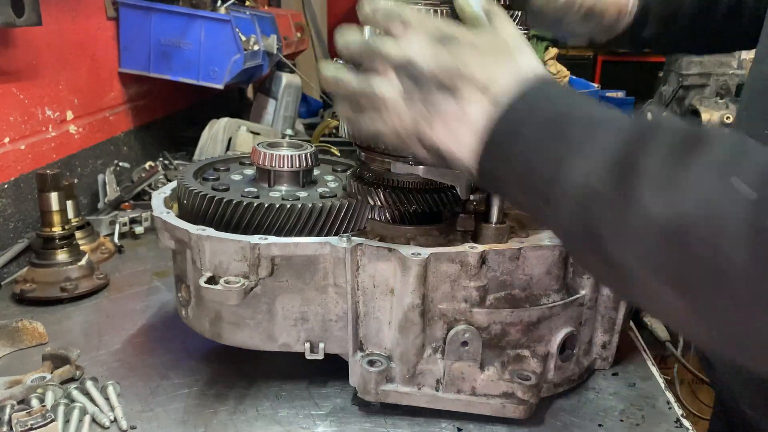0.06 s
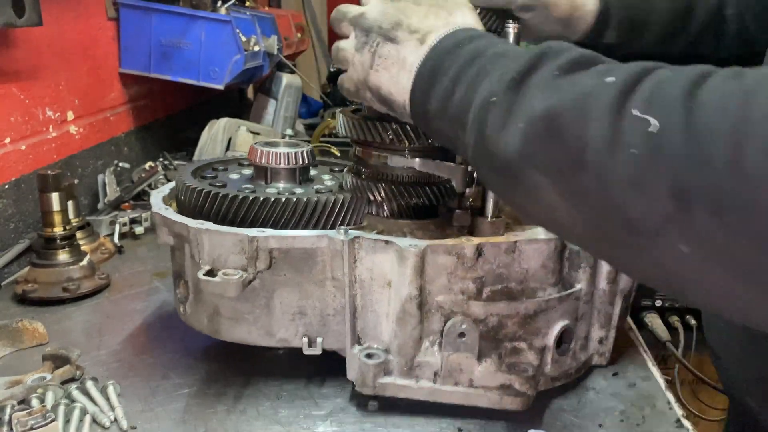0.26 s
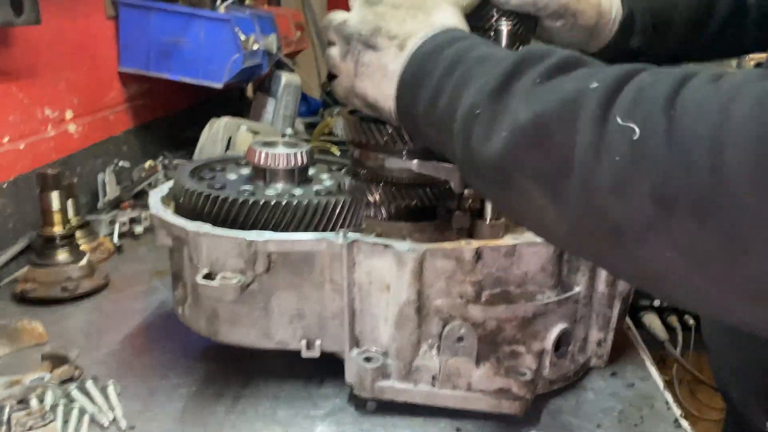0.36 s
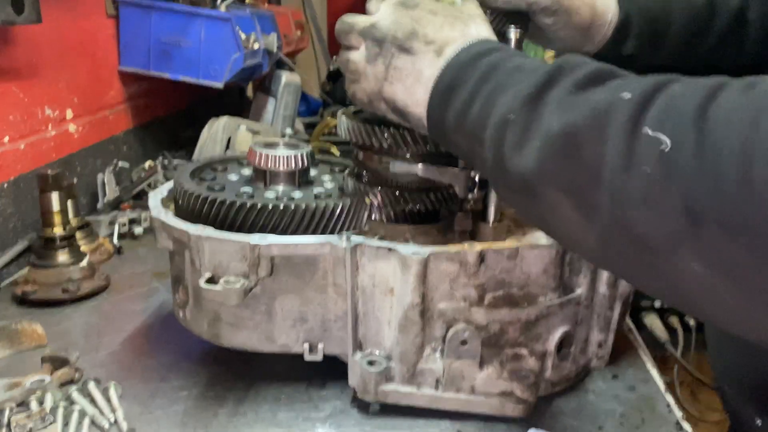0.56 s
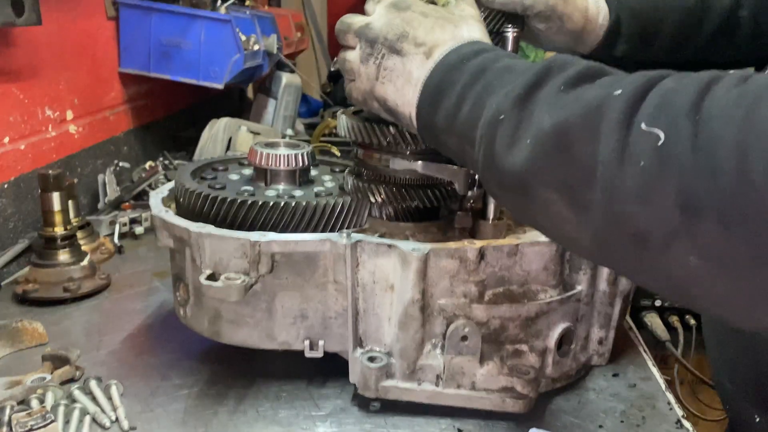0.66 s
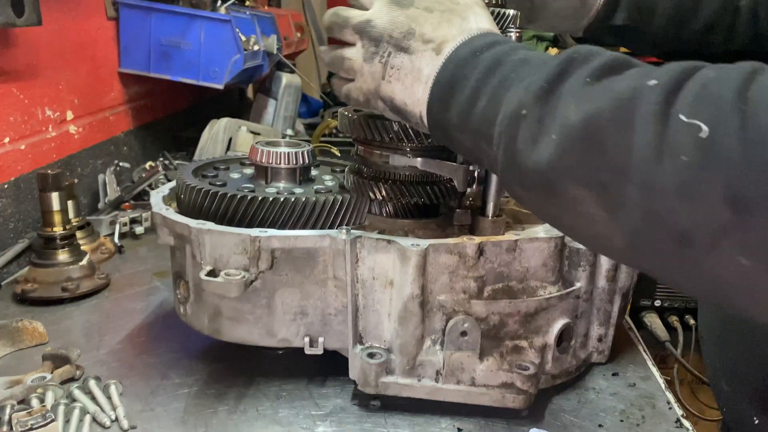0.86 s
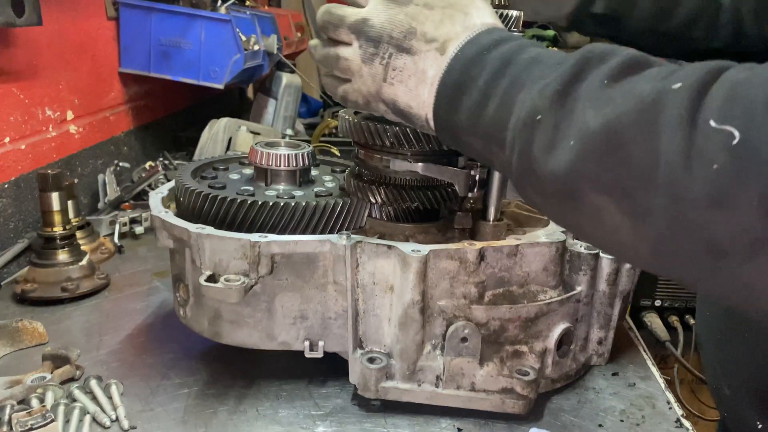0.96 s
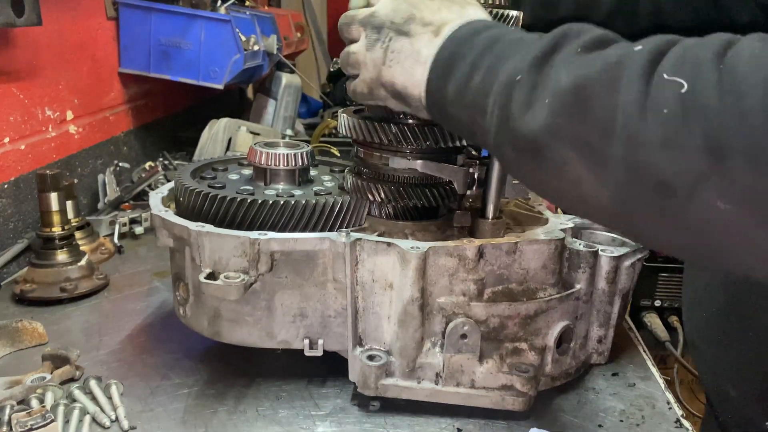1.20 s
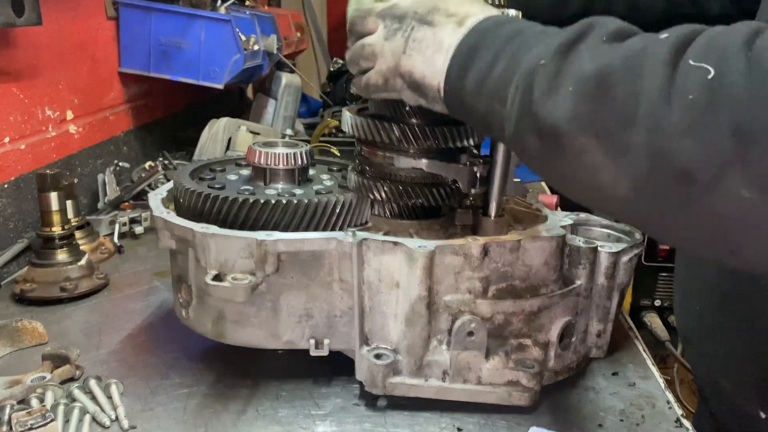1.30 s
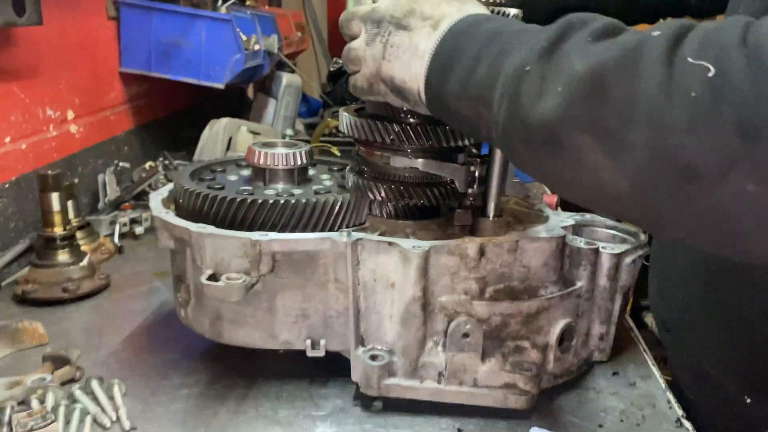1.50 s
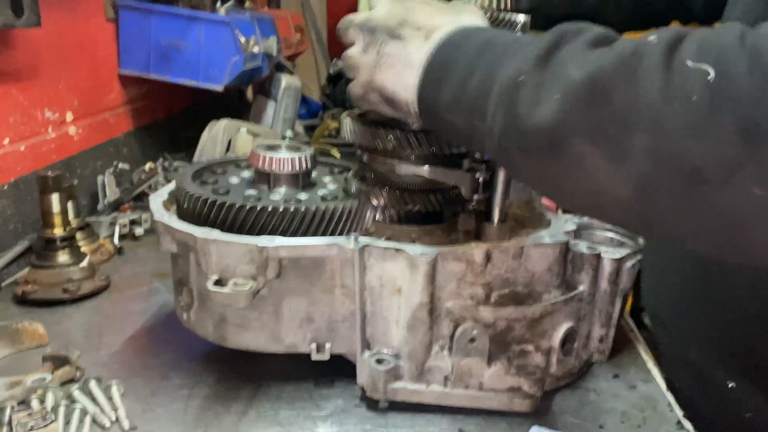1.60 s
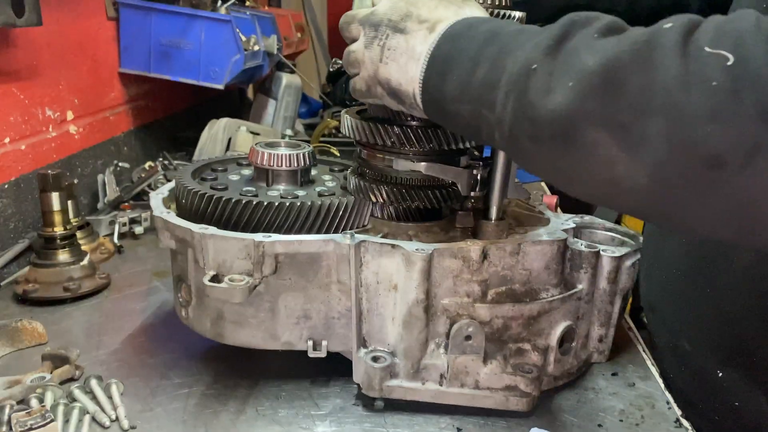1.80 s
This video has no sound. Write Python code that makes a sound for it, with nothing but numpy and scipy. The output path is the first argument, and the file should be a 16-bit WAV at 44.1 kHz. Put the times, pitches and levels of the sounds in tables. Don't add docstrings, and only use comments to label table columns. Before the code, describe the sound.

Steel gear clusters clatter and knock in an alloy gearbox case on a workshop bench

```python
import sys
import numpy as np
from scipy import signal
from scipy.fft import rfft, irfft
from scipy.io import wavfile
from scipy.ndimage import uniform_filter1d

SR = 44100
rng = np.random.default_rng(int(sys.argv[2]) if len(sys.argv) > 2 else 0)


def materialize(psi):
    bounded = np.clip(np.atleast_2d(psi).T, -1, 1)
    quanta = np.round(bounded * 32767).astype(np.int16)
    wavfile.write(sys.argv[1], SR, quanta)


def field_ratio(decibels):
    return 10 ** (np.asarray(decibels, dtype=float) / 20)


N = 81585
SIDES = np.array([[1], [-1]])


def on_log(hz, table):
    table = np.array(table, float)
    return np.interp(np.log(np.maximum(hz, 1)), np.log(table[:, 0]), table[:, 1])


def rings(hz, t60, length_s):
    t = np.arange(int(length_s * SR)) / SR
    fade = np.log(1000) / np.maximum(t60, .004)
    return np.exp(np.outer(2j * np.pi * hz - fade, t))


def add(out, start_s, x, peak_db):
    i = int(start_s * SR)
    x = x[:, :N - i]
    out[:, i:i + x.shape[1]] += x * field_ratio(peak_db) / np.abs(x.mean(axis=0)).max()


def blows(rows, partials, rise_s, apart_s):
    out, partials = np.zeros((2, N)), np.array(partials)
    ratio, ratio_db = partials.T
    luck = rng.standard_normal((len(rows), len(partials)))
    for (start_s, peak_db, hz, t60), g in zip(rows, luck):
        level = field_ratio(ratio_db + 2 * g * (ratio != 1))
        x = level @ rings(hz * ratio, t60 / ratio, .3)
        x = x * (1 - np.exp(-np.arange(len(x)) / SR / rise_s))
        turn = np.exp(1j * np.pi * hz * apart_s * SIDES)
        add(out, start_s, (x * turn).imag, peak_db)
    return out


def bands(length):
    f = np.fft.rfftfreq(length, 1 / SR)
    for hz in 25 * 2 ** np.arange(0, 9.4, 1 / 3):
        shape = np.exp(-(np.log2(f / hz + 1e-9) * 4) ** 2)
        mid, side = irfft(rfft(rng.standard_normal((2, length))) * shape, length)
        share = hz ** 2 / (hz ** 2 + 240 ** 2)
        yield hz, mid + share * side * SIDES


def wander(k, smooth):
    steps = np.repeat(rng.standard_normal(N // k + 1), k)
    return uniform_filter1d(steps, smooth)[:N]


# start in seconds, peak in dB, chatter length in seconds, tilt in dB per octave.
ROCKING = [(.022,-32,0.016,3.5),(.044,-16.5,0.0044,6),(.093,-24,0.021,-7),(.109,-14.5,0.018,4.5),(.175,-16.5,0.011,1),(.198,-14,0.03,-5),(.226,-17,0.018,-2.5),(.240,-23.5,0.0099,20.5),(.246,-6.5,0.023,-0.5),(.262,-11.5,0.021,-6),(.303,-2,0.015,2.5),(.325,-15,0.018,-1),(.345,-6.5,0.014,-2.5),(.355,-7.5,0.018,-4.5),(.365,1.5,0.014,1.5),(.376,-0.5,.02,7.5),(.394,2,.016,3.5),(.408,-14,0.02,4),(.476,-44,0.0085,20),(.500,-27,0.018,-18),(.519,-13.5,0.014,-6.5),(.547,-18.5,0.012,2),(.626,-7.5,0.01,2),(.644,-10.5,0.018,-0.5),(.672,-6,0.013,-2),(.944,-31.5,0.023,-9),]
# start in seconds, peak in dB, chatter length in seconds, tilt in dB per octave.
SETTLING = [(1.053,-58,.008,-5),(1.133,-45,0.025,18),(1.15,-26,.025,-6),(1.176,-14.5,0.017,-2.5),(1.196,-12,.02,-4),(1.224,-21,0.012,-12),(1.261,-18.5,.02,-7),(1.281,-8,.016,-2.5),(1.294,-4,0.028,-1.5),(1.316,-6,0.02,-12.5),(1.328,-16,.025,11),(1.365,-27,.01,14),(1.385,-17.5,.03,-4.5),(1.422,-13,.012,-0.5),(1.431,2,.016,-4.5),(1.447,-4,.02,-1.5),(1.459,-8.5,.022,-1.5),(1.497,-20.5,.016,-5.5),(1.526,-7.5,0.03,-6.5),(1.563,-2.5,.014,-1),(1.576,-12,.028,-8.5),(1.677,-22,0.03,-9),(1.703,-19.5,0.028,-9),(1.734,-55,0.021,-32),(1.816,-27,.01,-6),]
# pitch in Hz, level in dB, t60 in seconds.
GEARS = [(1510,-13.5,0.25),(2460,1,0.067)]
# frequency in Hz, level in dB per Hz.
CLATTER = [(350,-11.5),(1240,-2.5),(2070,-1.5),(3100,-8),(4200,-20.5),(7000,-41),(11000,-49.5),(16000,-64)]


def steel_contacts(hits):
    count, ticks = 160, 70
    clatter_t60_s, t60_slope = .045, -.1
    clatter_scatter_db, gear_scatter_db = 3, 4
    chatter_fall_db, chatter_scatter_db, first_db = -11, 2.6, 3
    first_touch, chatter_rise = .4, .25
    width_rad, width_hz = 1.4, 180
    out, gears = np.zeros((2, N)), np.array(GEARS)
    hz = np.geomspace(350, 16000, count) * (1 + .01 * rng.standard_normal(count))
    t60 = clatter_t60_s * (hz / 1000) ** t60_slope
    dense_db = on_log(hz, CLATTER) + 10 * np.log10(hz / 1000) - 10 * np.log10(t60 / clatter_t60_s)
    every = np.r_[hz, gears[:, 0]]
    bank = rings(every, np.r_[t60, gears[:, 2]], .15)
    luck = rng.standard_normal((len(hits), 3, len(every)))
    when = rng.random((len(hits), 2, ticks))
    for (start_s, peak_db, length_s, tilt_db), g, w in zip(hits, luck, when):
        clatter_db = dense_db + clatter_scatter_db * g[0, :count]
        gear_db = gears[:, 1] + gear_scatter_db * g[0, count:]
        level = field_ratio(np.r_[clatter_db, gear_db] + tilt_db * np.log2(every / 1500))
        apart = width_rad * g[1] * every / (every + width_hz)
        body = np.array([((level * np.exp(1j * (g[2] + k * apart / 2))) @ bank).imag for k in (1, -1)])
        place = np.r_[0, w[0, 1:] ** 1.3]
        size_db = chatter_fall_db * place - chatter_scatter_db * np.log(w[1]) + first_db * (place == 0)
        size = field_ratio(size_db) * np.minimum(first_touch + place / chatter_rise, 1)
        push = np.zeros(int(max(1.4 * length_s, .001) * SR) + 2)
        spot = (place * (len(push) - 1)).astype(int)
        np.add.at(push, spot, size * (-1.) ** np.arange(ticks))
        add(out, start_s - .001, signal.fftconvolve(body, push[None]), peak_db)
    return out


# start in seconds, peak in dB, pitch in Hz, t60 in seconds.
PINGS = [(.176,-15,1790,0.0067),(.306,-20.5,4650,0.027),(.377,-13,3040,0.087),(.627,-15.5,1850,0.031),(.410,-16.5,1520,0.054),(.678,-26.5,1500,0.12),(1.233,-21.5,1150,0.041),(1.265,-28,1160,0.14),(1.340,-26.5,3030,0.039),(1.432,-6,1113,0.018),(1.450,-8,2980,0.03),(1.440,-42.5,7200,0.11),(1.458,-13,1407,0.077),(1.568,-15,1451,0.048),(1.703,-31,1510,0.12),(1.818,-39,1520,0.12)]
# start in seconds, peak in dB, pitch in Hz, t60 in seconds.
RINGS = [(1.450,-57.5,11340,0.1),(.306,-24,1386,0.07),(.392,-7,1400,0.063),(.412,-15.5,2900,0.033),(.430,-50,4900,0.99),(.632,-20.5,1510,.15),(.645,-25,3120,0.027),(.680,-26,1504,0.13),(.690,-58,4740,0.63),(1.295,-19.5,1132,0.09),(1.300,-17,2237,0.079),(1.345,-23,1462,0.068),(1.445,-38.5,6820,0.25),(1.465,-17,1508,0.041),(1.497,-38,3045,0.13),(1.572,-27.5,3020,.06),(.052,-32,1500,0.069),(1.822,-38,1506,0.12)]


def ringing_parts():
    pings = blows(PINGS, [(1, 13), (1.012, -15)], rise_s=.005, apart_s=3e-5)
    return pings + blows(RINGS, [(1, 5.5), (1.02, -9.5)], rise_s=.0034, apart_s=3e-5)


# start in seconds, peak in dB, pitch in Hz.
BOOMS = [(0.049, -22.5, 288), (0.18, -24.5, 307), (0.21, -21.5, 318), (0.242, -7.5, 288),
         (0.27, -8.5, 289.6), (0.304, -8.5, 295), (0.37, -3.5, 301), (0.388, -7, 288.4), (0.524, -21, 300),
         (0.629, -19.5, 273), (0.677, -19, 284), (0.946, -35.5, 285), (1.2, -23, 354),
         (1.284, -10.5, 316.6), (1.304, -7, 293.6), (1.3215, -2, 293), (1.344, -12, 292),
         (1.436, -7.5, 285), (1.532, -12.5, 278), (1.562, -9, 263.3), (1.577, -27, 280),
         (1.697, -31.5, 317)]


def case_booms():
    rows = [(*row, .07) for row in BOOMS]
    partials = [(1, 3.5), (1.07, -6.5), (1.161, -3), (1.544, -1), (1.727, 0)]
    return blows(rows, partials, rise_s=.012, apart_s=1e-4)


# start in seconds, peak in dB, pitch in Hz.
THUMPS = [(0.138,-26,73.6),(0.205,-23.5,86),(0.244,-4.5,88.5),(0.271,-7.5,88),(0.309,-15.5,76.6),(0.383,-19.5,82.6),(0.537,-28.5,76),(1.199,-27,73.7),(1.294,-17.5,82),(1.328,-8.5,77.3),(1.357,-11,69.6),(1.452,-25,84.5),(1.547,-14,67),(1.578,-19,90),(1.692,-30,69)]


def bench_thumps():
    rows = [(*row, .13) for row in THUMPS]
    return blows(rows, [(1, 15.5), (1.32, -8)], rise_s=.0052, apart_s=0)


# time in seconds, level in dB.
RUSTLE = [(0,-57),(.15,-56),(.3,-46),(.5,-74),(0.618,-59),(.76,-64),(1.03,-80),(1.08,-60),(1.28,-57),(1.45,-58),(1.64,-66),(1.85,-62)]


def rustle():
    low_hz, tilt_db, flicker_db = 4440, -5.5, 1
    k = SR // 60
    flicker = wander(k, k // 2)
    hiss = 0
    for hz, x in bands(N):
        low_cut = 1 + (low_hz / hz) ** 4
        hiss = hiss + x * field_ratio(tilt_db * np.log2(hz / 8000)) / low_cut / np.sqrt(hz)
    time_s, level_db = np.array(RUSTLE).T
    level = field_ratio(np.interp(np.arange(N) / SR, time_s, level_db) + flicker_db * flicker)
    return hiss / np.sqrt(np.mean(hiss ** 2)) * level


# start in seconds, peak in dB, centre in Hz, fade in seconds.
TICKS = [(0.021,-41,5800,0.0071),(.079,-40.5,8800,0.031),(0.198,-43,11000,.006),(0.211,-34,8700,0.0061),(0.239,-31,12000,0.0051),(0.295,-36,12000,.004),(.355,-21.5,10500,0.018),(0.365,-27,6800,0.0064),(0.375,-14,4630,.012),(0.397,-29,5500,0.0069),(.474,-44,11000,0.0045),(.246,-13,2420,0.0027),(0.953,-48,10870,0.0033),(0.976,-52,10960,0.015),(1.004,-54,10900,0.0055),(1.056,-51,7900,0.016),(1.074,-35,6800,0.0054),(1.127,-43,7180,0.012),(1.17,-51,3000,0.009),(1.425,-30.5,10830,0.0052),(1.364,-35,7060,.004),(1.53,-29,6940,.004),(1.680,-51,11000,0.011),(1.696,-41,7000,0.0058),(1.734,-41,11900,0.0026),(1.563,-33,8500,.008),(1.814,-24,1940,0.0032),(1.827,-44,10600,0.0067)]


def grit_ticks():
    out, t = np.zeros((2, N)), np.arange(4096) / SR
    f = np.fft.rfftfreq(len(t), 1 / SR)
    noises = rng.standard_normal((len(TICKS), 2, len(t)))
    for (start_s, peak_db, hz, fade_s), x in zip(TICKS, noises):
        shape = np.exp(-(np.log2(f / hz + 1e-9) / .7) ** 2)
        x = irfft(rfft(x[0] + .5 * x) * shape, len(t))
        envelope = np.exp(-t / max(fade_s, .001)) * np.minimum(t / .0004, 1)
        add(out, start_s, x * envelope, peak_db)
    return out


# frequency in Hz, t60 in seconds.
ROOM_T60 = [(300,1.23),(1500,2.05),(3500,2.14),(7000,1.86),(14000,0.31)]


def workshop(dry):
    room_db, tilt_db, delay_s = -17, -1.93, .011
    bench_echo_db, bench_t60_s = 16, .11
    t = np.arange(N) / SR
    early = field_ratio(bench_echo_db - 60 * t / bench_t60_s)
    tail = 0
    for hz, x in bands(N):
        late = field_ratio(tilt_db * np.log2(hz / 1000) - 60 * t / on_log(hz, ROOM_T60))
        tail = tail + x * (early + late)
    tail = tail * np.clip(t / delay_s - 1, 0, 1)
    tail = tail / np.sqrt((tail ** 2).sum(axis=1).mean())
    return field_ratio(room_db) * signal.fftconvolve(tail, dry.mean(axis=0)[None])[:, :N]


# frequency in Hz, level in dB per Hz.
SHOP = [(25,14.5),(70,10.5),(200,-8),(1900,-15),(4700,-34.5),(7000,-68),(12000,-49)]


def hum():
    k, out = SR // 12, 0
    for hz, x in bands(N):
        out = out + x * field_ratio(on_log(hz, SHOP) + 2 * wander(k, k))
    return out * field_ratio(-42) / np.sqrt(np.mean(out ** 2))


def scene():
    parts = steel_contacts(ROCKING + SETTLING) + ringing_parts()
    case = case_booms()
    room = workshop(parts + field_ratio(-3.5) * case)
    return parts + case + bench_thumps() + rustle() + grit_ticks() + room + hum()


def band_limit(x):
    return signal.sosfilt(signal.butter(12, 16800, fs=SR, output="sos"), x)


# frequency in Hz, left over right in dB.
LEFT_GAIN = [(200,1.4),(320,-6.5),(600,4),(2000,-0.9),(4500,5.5),(6500,-5)]


def record(dry):
    lead_s, merge_hz = 4e-5, 6300
    in_step_hz, turn_hz, stair = 7050, 4150, .75
    low_cut_hz, top_hz = 58, 15650
    f = np.fft.rfftfreq(N, 1 / SR)
    spec = rfft(np.tanh(.95 * dry) / 1.182)
    low = spec * field_ratio(SIDES * on_log(f, LEFT_GAIN) / 2) * np.exp(1j * np.pi * f * lead_s * SIDES)
    slip = 2 * np.pi * (f - in_step_hz) / turn_hz
    high = spec[0] * np.exp(-.5j * SIDES * (slip - stair * np.sin(2 * slip) / 2))
    share = 1 / (1 + (f / merge_hz) ** 16)
    cut = 1 / np.sqrt((1 + (low_cut_hz / (f + 1)) ** 5) * (1 + (f / top_hz) ** 80))
    mix = irfft((np.sqrt(share) * low + np.sqrt(1 - share) * high) * cut, N)
    return band_limit(mix)


dry = scene()
out = record(dry)
materialize(out)
```